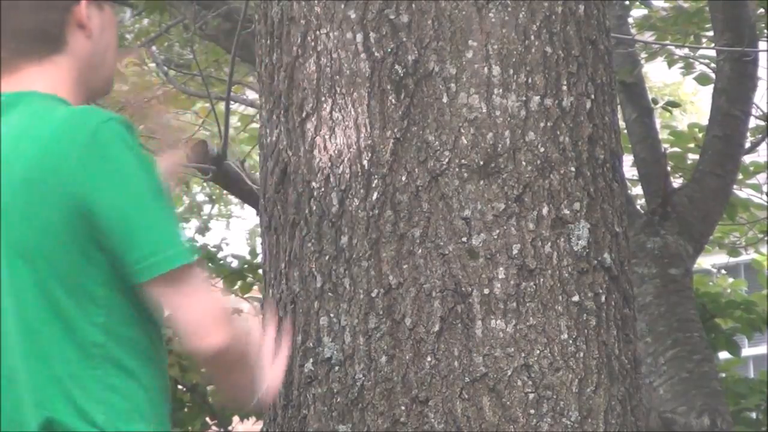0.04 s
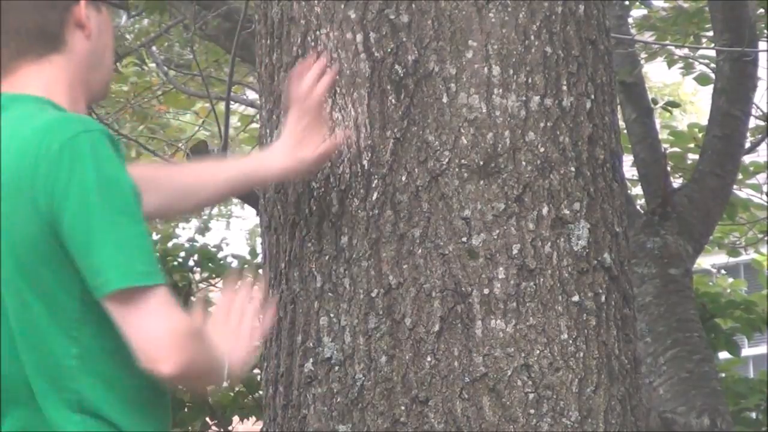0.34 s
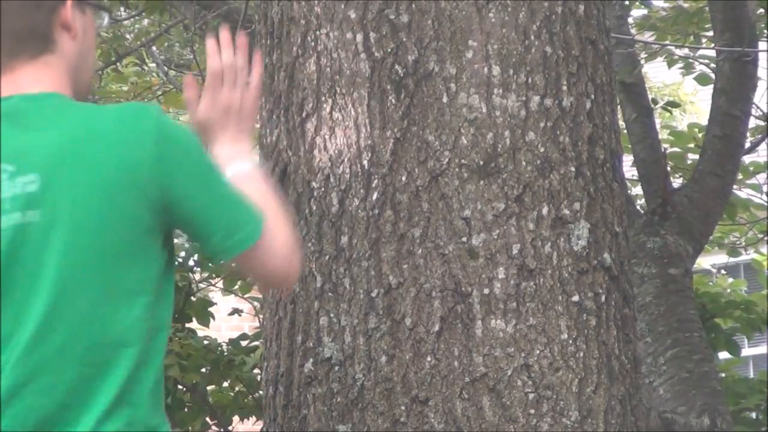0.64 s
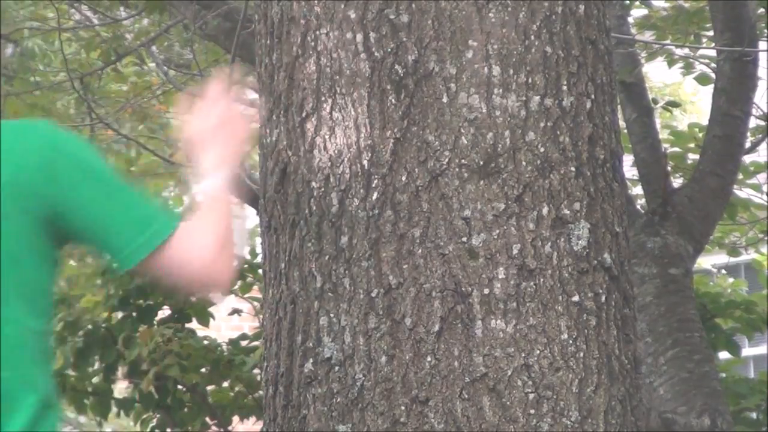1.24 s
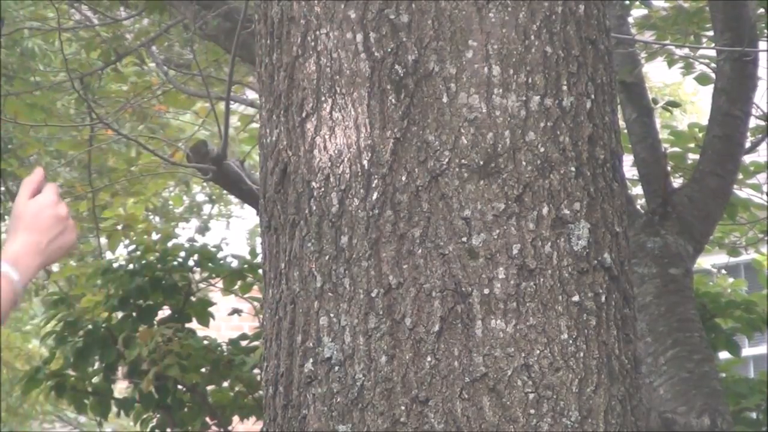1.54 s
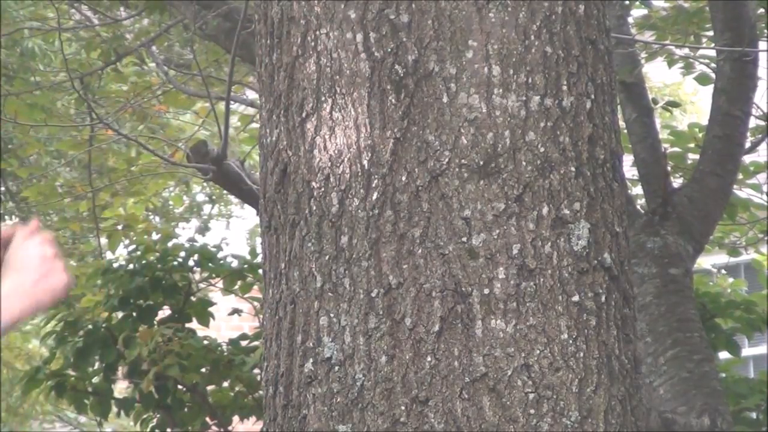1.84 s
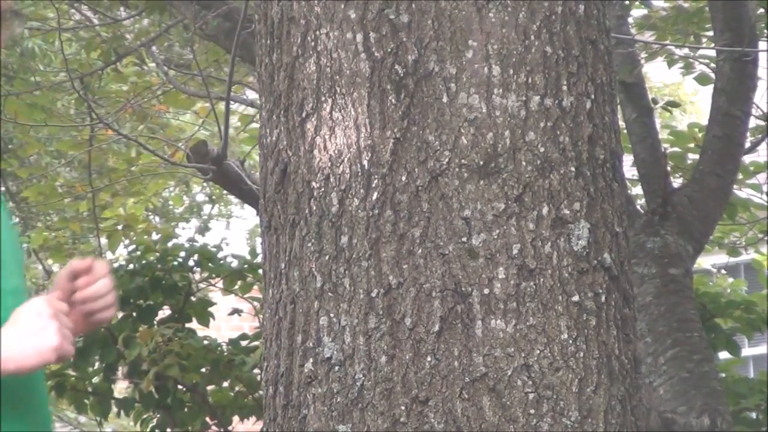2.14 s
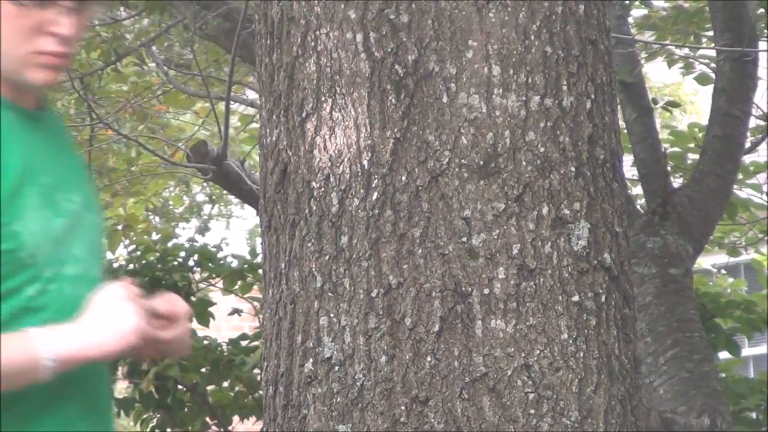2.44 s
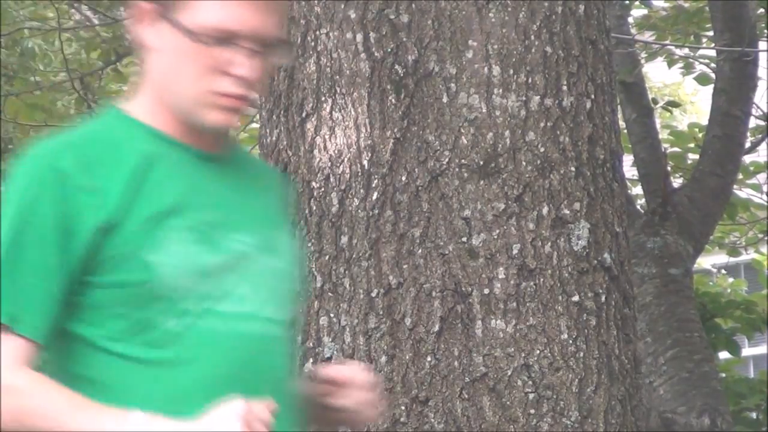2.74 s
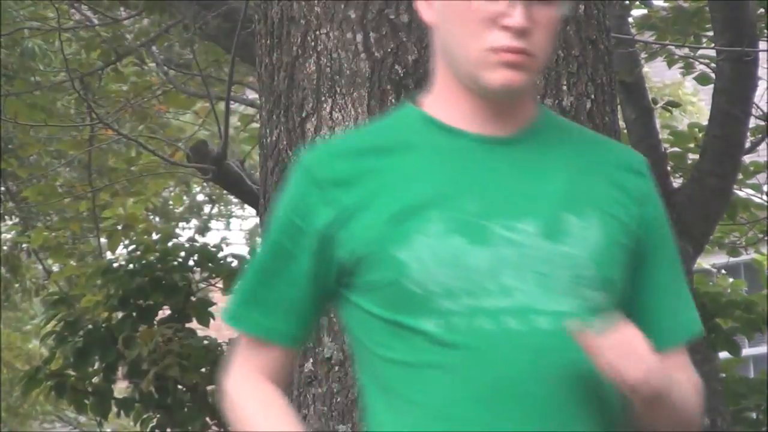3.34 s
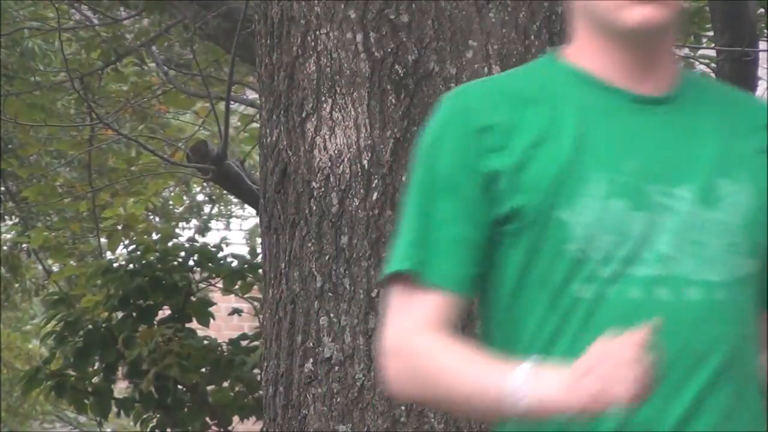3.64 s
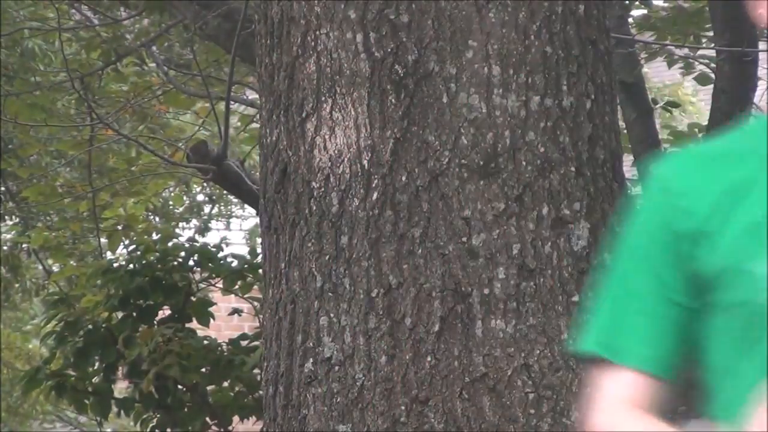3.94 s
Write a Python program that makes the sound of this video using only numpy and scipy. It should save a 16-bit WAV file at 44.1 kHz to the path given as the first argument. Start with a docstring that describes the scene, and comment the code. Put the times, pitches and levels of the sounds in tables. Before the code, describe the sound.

Two sharp hand slaps hit a tree trunk close to the microphone. After a pause, a few light footsteps crunch over twigs and dry litter. Distant traffic rumbles outdoors, with faint insects and a far bird.

```python
"""Tree slaps and dry footsteps

Two hands slap a trunk in turn, then shoes crunch over dry ground close to a camcorder.
Each slap or step is a quick cluster of contacts, scattered back by the ground and nearby trees.
Behind them sit far traffic, a swelling engine drone, insects, a faint bird and the camcorder's whirr."""
import sys
import numpy as np
from scipy import signal
from scipy.fft import rfft, irfft
from scipy.io import wavfile
from scipy.ndimage import uniform_filter1d

SR = 44100
rng = np.random.default_rng(int(sys.argv[2]) if len(sys.argv) > 2 else 0)


def bounce(signal):
    """Save signal as a 16-bit WAV file at the path given by the first command-line argument."""
    frames = np.transpose(np.atleast_2d(signal))
    limited = np.clip(frames, -1, 1)
    pcm = np.round(limited * 32767).astype(np.int16)
    wavfile.write(sys.argv[1], SR, pcm)


N = 4 * SR

# Palm and fingers meeting bark.
# Each row: start in seconds, decay in seconds, then palm pop, bark crack and fizz levels in dB.
BARK_HITS = [(0.1887, .0006, -42, -35, -35), (0.1914, 0.00096, -21.5, -21, -24),
             (0.1935, 0.0014, -29, -31, -35), (0.2028, 0.0016, -37, -38, -33),
             (0.2063, 0.0042, -36, -44, -40), (0.81, 0.0013, -33, -25.5, -35),
             (0.8132, 0.00093, -29, -40, -37), (0.8168, 0.00057, -36, -21.5, -22),
             (0.8209, 0.00055, -42, -20, -31)]
# The weight of each hand landing. Each row: start in seconds, trunk thud in dB, flesh knock in dB.
HAND_LANDINGS = [(0.1918, -23, -24), (.8120, -33, -24.5)]


def slaps():
    """Air pops from under the palm, bark cracks under the fingers, flesh knocks and the trunk thuds."""
    pop_hz, crack_hz, fizz_hz, knock_hz = (990, 2080), (3730, 7800), (8300, 13500), (278, 1060)
    thud_hz, thud_decay_s = 135, 0.0039
    out = np.zeros(N)
    for start, decay, *levels in BARK_HITS:
        for edges, db in zip((pop_hz, crack_hz, fizz_hz), levels):
            add(out, start, undb(db) * contact(lambda x: band(x, *edges, order=3), decay))
    age = np.arange(SR // 10) / SR
    thud = np.sin(2 * np.pi * thud_hz * age) * np.exp(-age / thud_decay_s)
    for start, thud_db, knock_db in HAND_LANDINGS:
        add(out, start, undb(thud_db) * thud)
        add(out, start, undb(knock_db) * contact(lambda x: band(x, *knock_hz), decay_s=0.0022))
    return out


# Shoes crushing twigs and litter.
# Each row: start in seconds, decay in seconds, level in dB, brightness in dB per octave, ring in Hz.
TWIG_SNAPS = [(2.7961, .0014, -23.5, -4, 1400), (2.7992, 0.0024, -26, 4, 1800),
              (2.9080, 0.0014, -24, -2, 2770), (2.9214, 0.0015, -25, 1.5, 2140),
              (3.4120, 0.0011, -29, -10, 1400), (3.4178, 0.0019, -21, -3, 2700),
              (3.4218, 0.0012, -31, 3, 1400), (3.45, 0.0033, -37, 6, 2600),
              (3.5222, 0.00075, -29, 4.5, 1800), (3.798, .006, -31, -5.5, 1790),
              (3.8951, 0.0016, -31.5, -1, 1700), (3.91, 0.0013, -25, -3, 3570),
              (3.9140, 0.0045, -19, 1, 1700), (3.9217, 0.00092, -22, -8, 1400)]
# The dull tone of a snap. Each row: frequency in Hz, gain in dB.
SNAP_EQ = [(200, -9), (500, 0), (800, -4), (1250, 1), (1850, -1), (2400, -6.5), (3500, -3.5), (4500, -9),
           (7000, -13.5), (9000, -21), (11500, -25), (16000, -42)]


def footsteps():
    """Twigs snap under the shoes, each with a brief woody ring."""
    ring_db, ring_width_hz = 6.5, 330
    out = np.zeros(N)
    for start, decay, db, tilt, hz in TWIG_SNAPS:
        def woody(x):
            ring = band(x, hz - ring_width_hz / 2, hz + ring_width_hz / 2, order=1)
            return colour(x + undb(ring_db) * ring, SNAP_EQ, tilt)
        add(out, start, undb(db) * contact(woody, decay))
    return out


# Brushes of litter, bark and cloth.
# Each row: start in seconds, rough length in seconds, level in dB, centre in Hz.
SWISHES = [(0.2, 0.026, -36, 3000), (1.717, 0.056, -48.5, 11000), (2.765, 0.096, -50.5, 7000),
           (2.773, 0.075, -35, 387), (2.88, 0.25, -55.5, 6040), (3.363, 0.18, -47, 2580),
           (3.507, 0.1, -54, 5950), (3.92, 0.05, -43, 3640)]


def rustles(t):
    """Litter, bark and clothes rustle in grainy swishes that rise fast and die away."""
    out = np.zeros(N)
    for start, length, db, hz in SWISHES:
        age = np.maximum(t - start, 0) / (length / 3)  # reaches 1 at the peak
        grainy = unit(hiss(hz, width_hz=hz) * np.exp(0.3 * wander(rate_hz=500)))
        out += undb(db) * age * np.exp(1 - age) * grainy
    return out


# The tone of the reflections. Each row: frequency in Hz, gain in dB.
SCATTER_EQ = [(200, -3.5), (1500, -3), (3200, 0.5), (7000, -3), (11000, 1), (16000, -33)]


def tree_scatter(x):
    """Ground and trunks scatter a sound back: a short dense cloud and a longer tail."""
    delay_s, rise_s, cloud_decay_s = 0.0055, 0.0014, 0.011
    tail_decay_s, tail_db, return_db = 0.074, 3.5, -5.5
    age = np.maximum(np.arange(SR // 2) / SR - delay_s, 0)
    env = np.exp(-age / cloud_decay_s) + undb(tail_db) * np.exp(-age / tail_decay_s)
    env *= 1 - np.exp(-age / rise_s)
    env *= np.exp(0.26 * rng.standard_normal(len(env)))  # adds grain
    env /= np.linalg.norm(env)
    responses = [env * colour(rng.standard_normal(len(env)), SCATTER_EQ) for _ in range(2)]
    mid, side = (signal.fftconvolve(x, response)[:N] for response in responses)
    return undb(return_db) * stereo(mid, side, width=0.45)


# The tone of the bed of traffic and leaves. Each row: frequency in Hz, gain in dB.
BED_EQ = [(20, -30), (32, -9), (45, -13), (65, -2), (100, -1.5), (135, 4), (180, -4), (240, -4.5),
          (320, -13), (600, -14.5), (1000, -17.5), (1500, -23), (1850, -27.5), (2150, -29.5), (4000, -33),
          (6500, -35.5), (8000, -36.5), (12000, -37.5), (16000, -37.5)]
# The bed's stereo width. Each row: frequency in Hz, side level in dB against the middle.
BED_WIDTH = [(30, -35), (70, -37), (120, -40.5), (250, -20), (500, -11), (1300, -6.5), (2400, -4.5),
             (4400, -6), (8000, -5.5), (15000, -17.5)]
# The bed's slow rise and fall. Each row: time in seconds, level in dB.
BED_FADER = [(0, -31.5), (1.3, -32.5), (2.1, -31), (2.8, -30.5), (3.4, -31.5), (4, -31.5)]
# The swell of a distant engine. Each row: time in seconds, level in dB.
ENGINE_FADER = [(0, -40), (.8, -40.5), (1.4, -48), (1.7, -36), (1.9, -32), (2.15, -27.5), (2.42, -27.5),
                (2.93, -26.5), (3.05, -33.5), (3.5, -42), (3.68, -37), (4, -43)]


def traffic(t):
    """Far road rumble under a thin hiss of leaves, with one engine drone swelling through it."""
    bed_waver_db, engine_hz, engine_waver_hz = 0.21, 111.5, 0.61

    def bed():
        gain = fader(t, BED_FADER) * undb(bed_waver_db * wander(rate_hz=5.02))
        return gain * unit(colour(rng.standard_normal(N), BED_EQ))
    mid, side = bed(), colour(bed(), BED_WIDTH)
    pitch_hz = engine_hz + engine_waver_hz * wander(rate_hz=4.16)
    drone = np.sqrt(2) * np.sin(2 * np.pi * np.cumsum(pitch_hz) / SR)
    return stereo(mid + fader(t, ENGINE_FADER) * drone, side)


# The voices of the insect chorus. Each row: centre in Hz, width in Hz, level in dB before the fader.
INSECT_BANDS = [(5250, 140, -57), (5552, 147, -57), (6460, 630, -83), (7100, 60, -83), (4190, 280, -64.5)]
# The chorus eases off and builds again. Each row: time in seconds, gain in dB.
INSECT_FADER = [(0, 2.5), (1, -0.5), (1.8, -1.5), (2.6, -1.5), (3.3, 2), (3.7, 1)]


def insects(t):
    """Insects shrill in narrow bands, then stop together."""
    stop_s, fade_s = 3.68, 0.05
    mid, side = (sum(undb(db) * hiss(hz, width) for hz, width, db in INSECT_BANDS) for _ in range(2))
    gate = np.clip((stop_s - t) / fade_s + 0.5, 0, 1)
    return gate * fader(t, INSECT_FADER) * stereo(mid, side, width=0.4)


# Three calls, high then low. Each row: start in seconds, length in seconds, pitch in Hz, level in dB.
BIRD_NOTES = [(.46, .1, 4130, -57), (0.507, .04, 2720, -47.5), (1.41, 0.13, 4240, -51.5),
              (1.485, 0.036, 2780, -48.5), (2.453, .09, 4060, -55), (2.509, .035, 2730, -46)]


def bird(t):
    """A far bird repeats a faint, breathy two-note call."""
    out = np.zeros(N)
    for start, length, hz, db in BIRD_NOTES:
        arch = np.sin(np.pi * np.clip((t - start) / length, 0, 1))
        out += undb(db) * arch * hiss(hz, width_hz=12 / length)  # shorter notes are noisier
    return out


def camcorder(t):
    """The tape mechanism sings briefly once a turn, with a thin steady whine above it."""
    turn_hz, first_peak_s, sharpness = 30, 0.0079, 2.9
    whirr_hz, whirr_db = 1704, -55
    whine_hz, whine_db = 15734, -64.5
    pulses = np.exp(sharpness * np.cos(2 * np.pi * turn_hz * (t - first_peak_s)))
    whirr = unit(pulses * np.sin(2 * np.pi * whirr_hz * t))
    whine = unit(np.sin(2 * np.pi * whine_hz * t))
    return undb(whirr_db) * whirr + undb(whine_db) * whine


def contact(tone, decay_s, attack_s=0.00061, size=2048):
    """A sharp burst of tiny fractures, filtered by tone; rms near 1 at its peak."""
    t = np.arange(size) / SR
    env = np.minimum(t / attack_s, 1) * np.exp(-np.maximum(t - attack_s, 0) / decay_s)
    phases = np.angle(rfft(rng.standard_normal(size) * env))
    flat_burst = irfft(np.exp(1j * phases), size)  # equal strength at every frequency
    return unit(tone(flat_burst * np.sqrt(env))) * np.sqrt(np.mean(env ** 2))


def undb(db):
    """Decibels to gain."""
    return 10 ** (np.asarray(db) / 20)


def unit(x):
    """Scale to rms 1."""
    return x / np.sqrt(np.mean(x ** 2))


def fader(t, points):
    """A gain that rides through (seconds, dB) points."""
    return undb(np.interp(t, *np.array(points).T))


def colour(x, points, tilt_db=0):
    """EQ by (Hz, dB) points, plus a tilt per octave about 2 kHz that levels off below 500 Hz."""
    octave = np.log2(np.maximum(np.fft.rfftfreq(len(x), 1 / SR), 1))
    hz, db = np.array(points).T
    curve = np.interp(octave, np.log2(hz), db)
    tilt = tilt_db * np.maximum(octave - np.log2(2000), -2)
    return irfft(rfft(x) * undb(curve + tilt), len(x))


def band(x, lo_hz, hi_hz, order=2):
    """Causal band-pass."""
    return signal.sosfilt(signal.butter(order, [lo_hz, hi_hz], 'band', fs=SR, output='sos'), x)


def hiss(hz, width_hz):
    """A band of noise, rms 1."""
    return unit(band(rng.standard_normal(N), hz - width_hz / 2, hz + width_hz / 2))


def wander(rate_hz):
    """Smooth random drift, rms 1."""
    hold = int(SR / rate_hz)
    stairs = np.repeat(rng.standard_normal(N // hold + 1), hold)
    return unit(uniform_filter1d(uniform_filter1d(stairs, hold), hold)[:N])


def add(out, start_s, x):
    """Mix a short sound in at a time."""
    i = int(start_s * SR)
    out[i:i + len(x)] += x[:max(N - i, 0)]


def stereo(mid, side, width=1):
    """Middle and side to left and right."""
    return np.array([mid + width * side, mid - width * side])


def scene():
    """Slaps and steps up close and centred, in front of a wide outdoor background."""
    t = np.arange(N) / SR
    hands = slaps()
    movement = footsteps() + rustles(t)
    reflections = tree_scatter(hands + undb(-5) * movement)
    return hands + movement + reflections + traffic(t) + insects(t) + bird(t) + camcorder(t)


def record(dry):
    """A steep low-pass trims the very top."""
    cutoff_hz = 15950
    return signal.sosfilt(signal.ellip(10, 0.2, 80, cutoff_hz, fs=SR, output='sos'), dry)


dry = scene()
out = record(dry)
bounce(out)
```